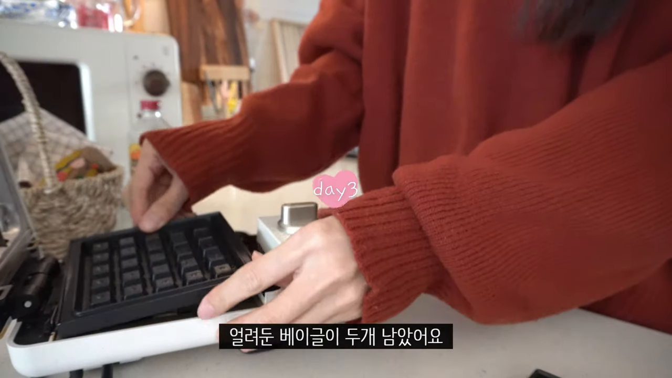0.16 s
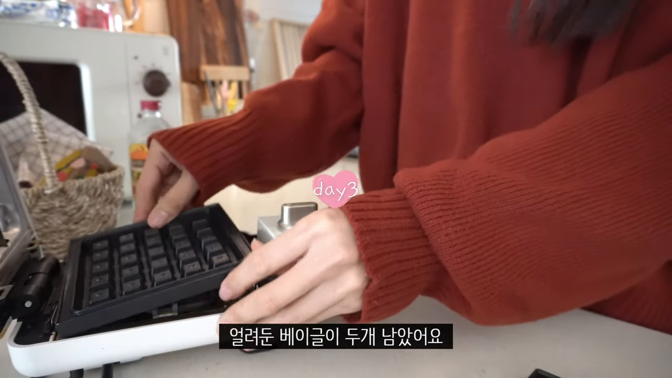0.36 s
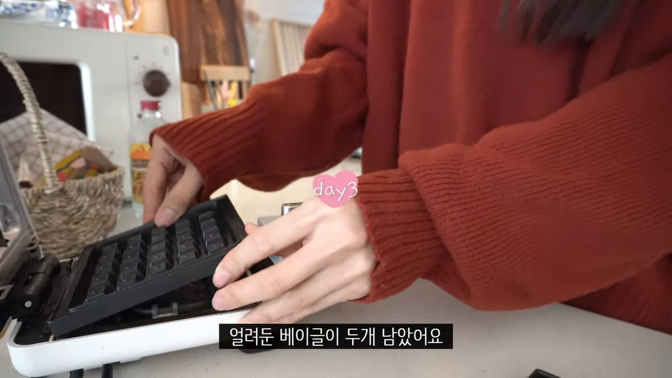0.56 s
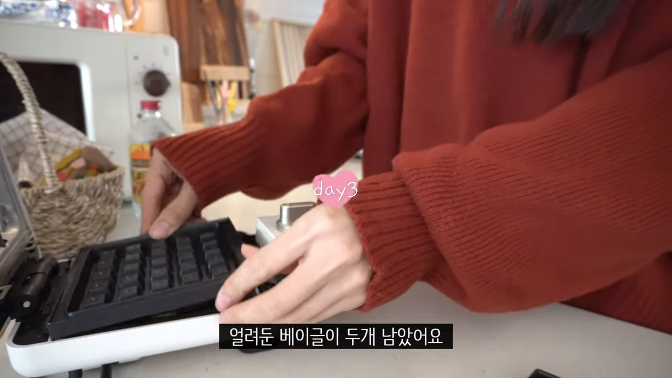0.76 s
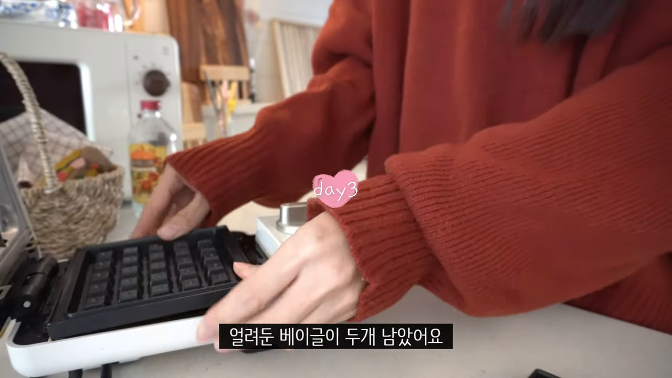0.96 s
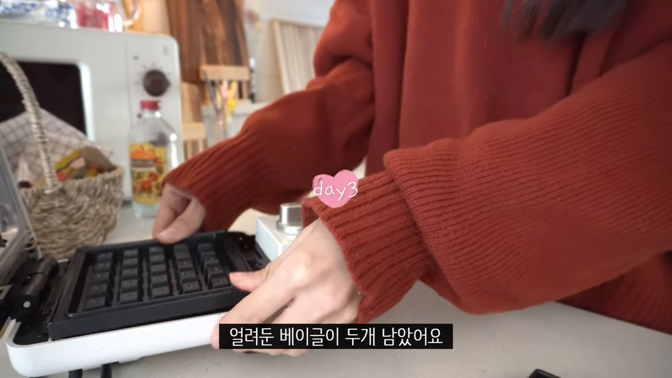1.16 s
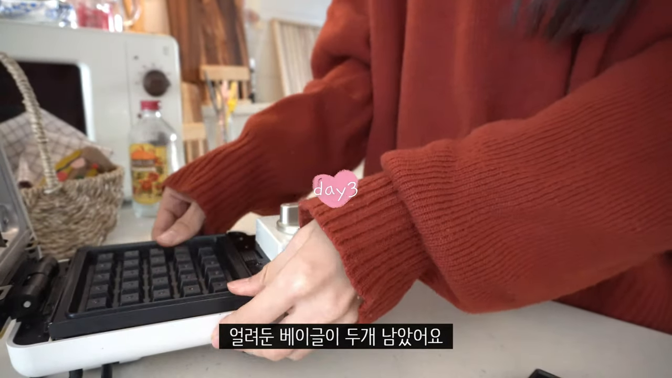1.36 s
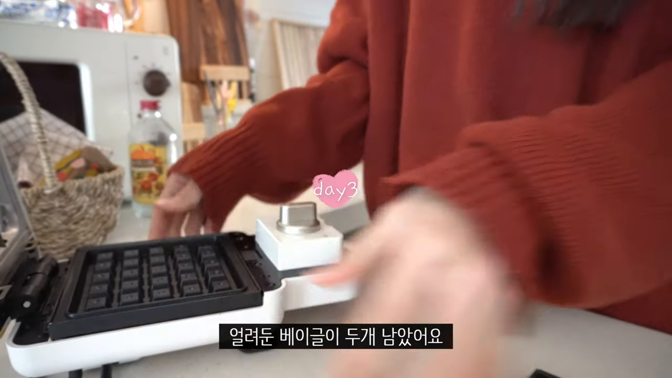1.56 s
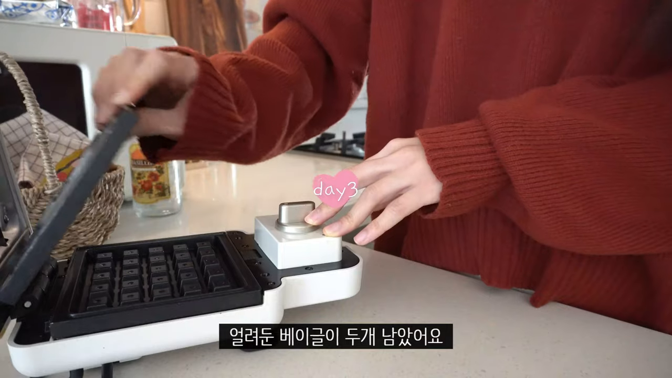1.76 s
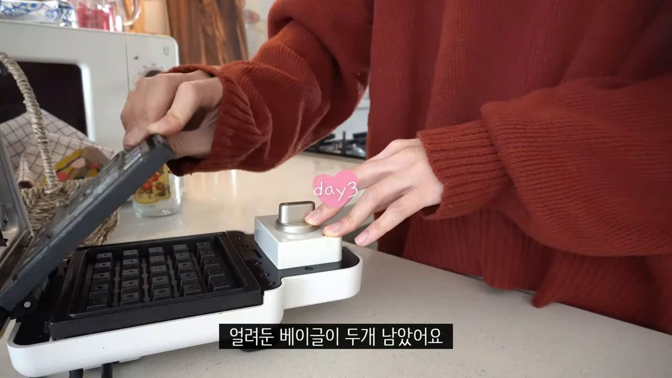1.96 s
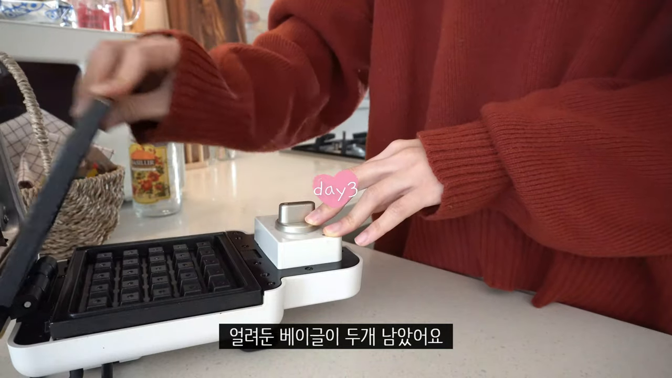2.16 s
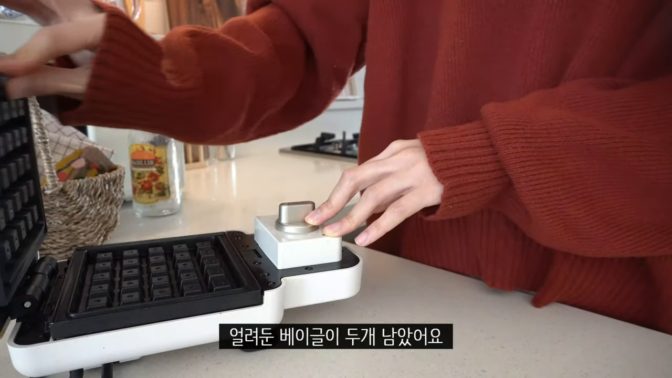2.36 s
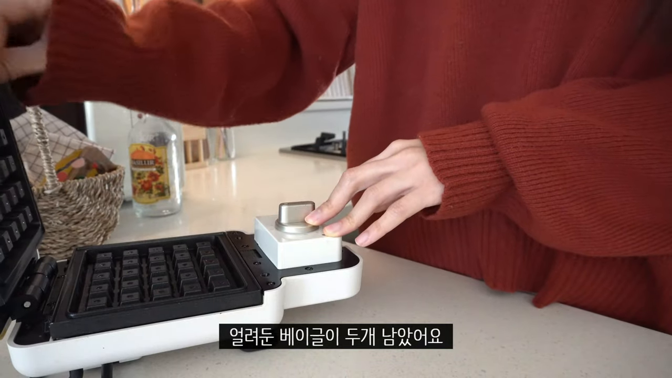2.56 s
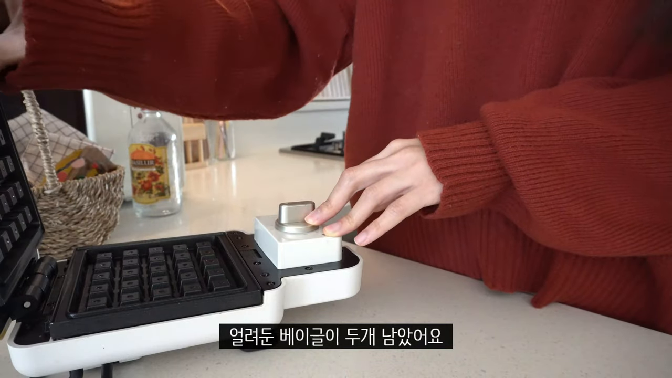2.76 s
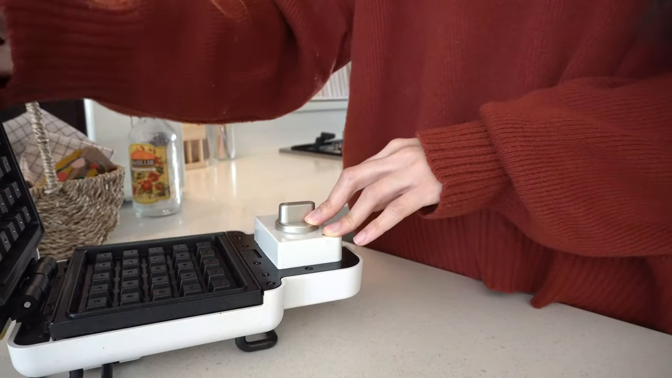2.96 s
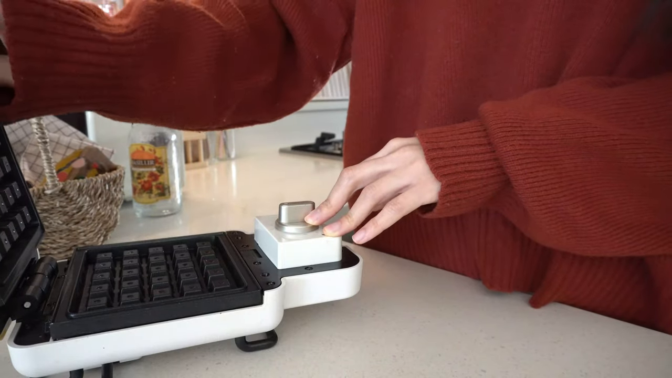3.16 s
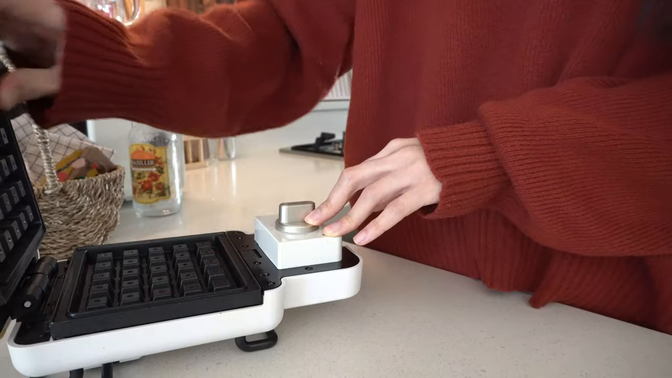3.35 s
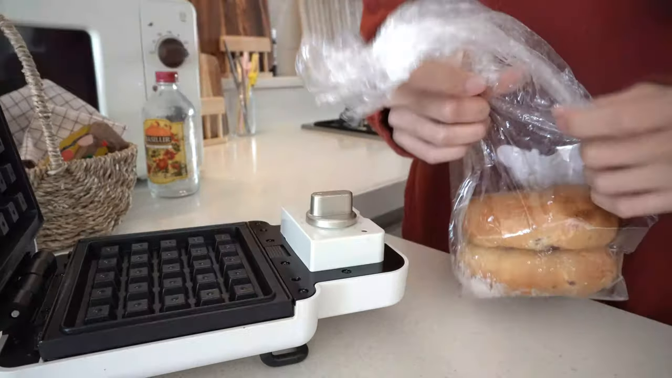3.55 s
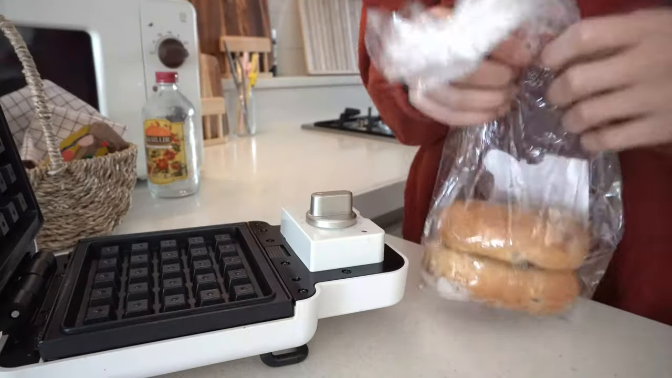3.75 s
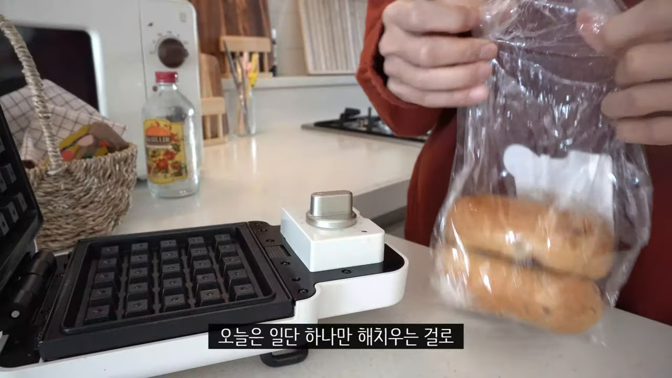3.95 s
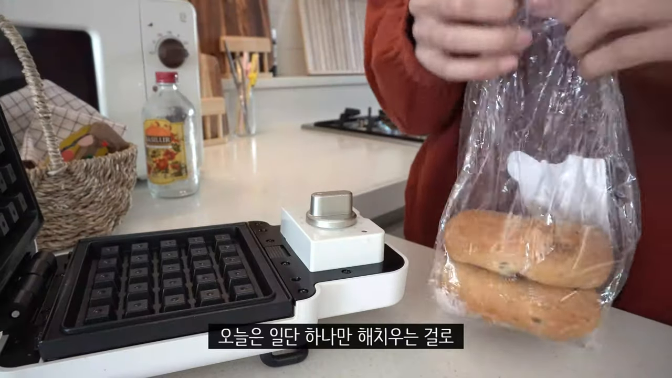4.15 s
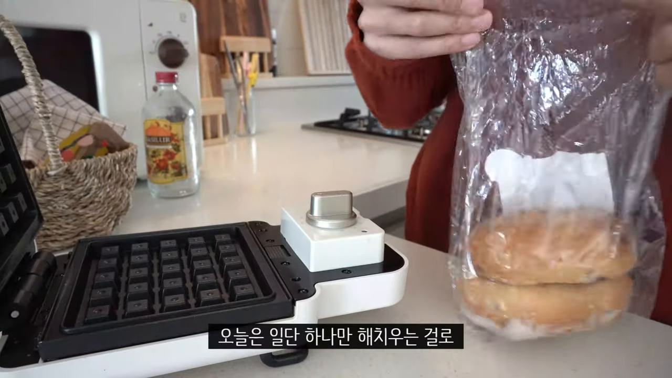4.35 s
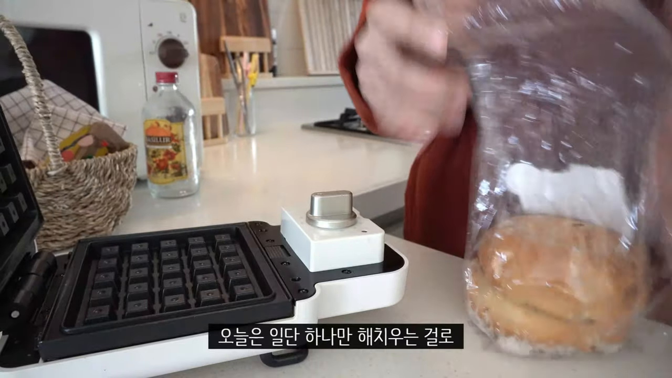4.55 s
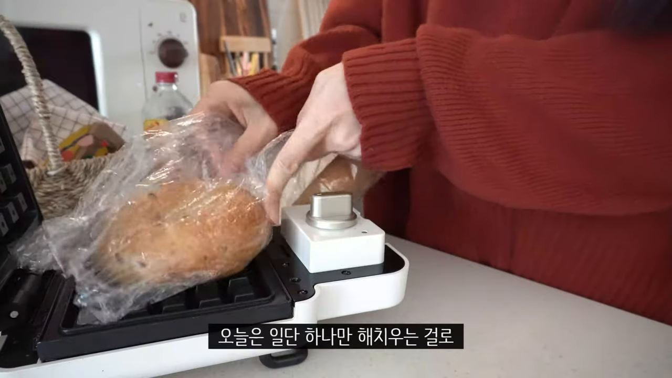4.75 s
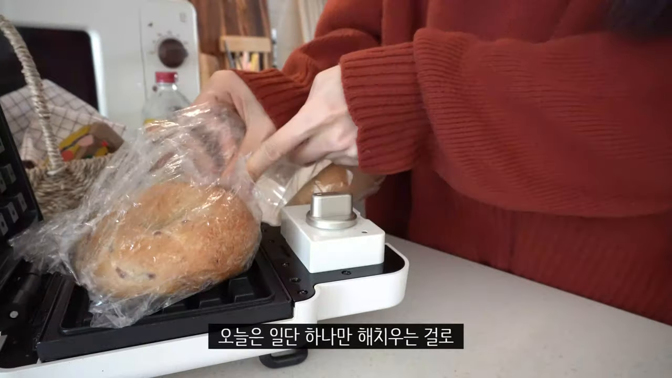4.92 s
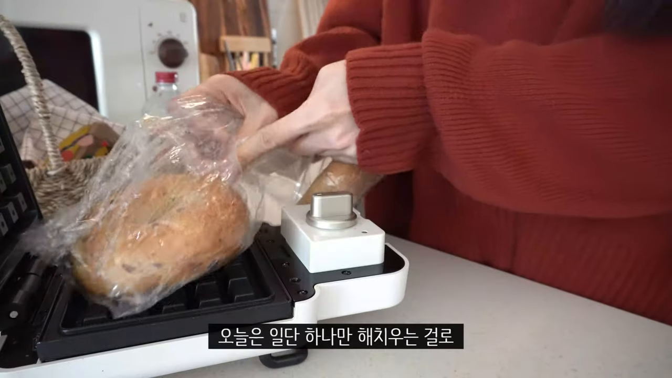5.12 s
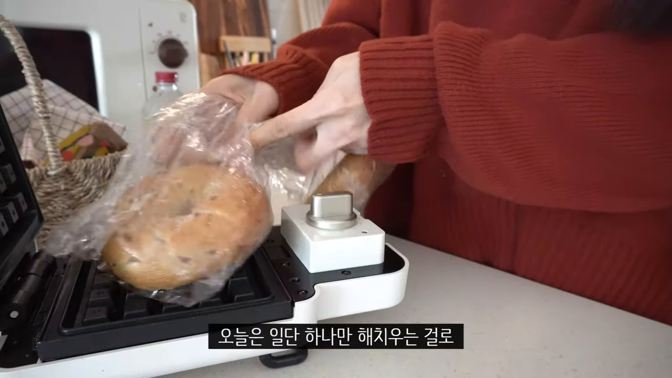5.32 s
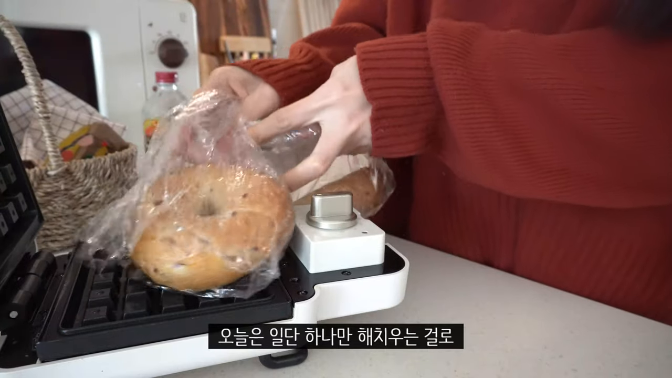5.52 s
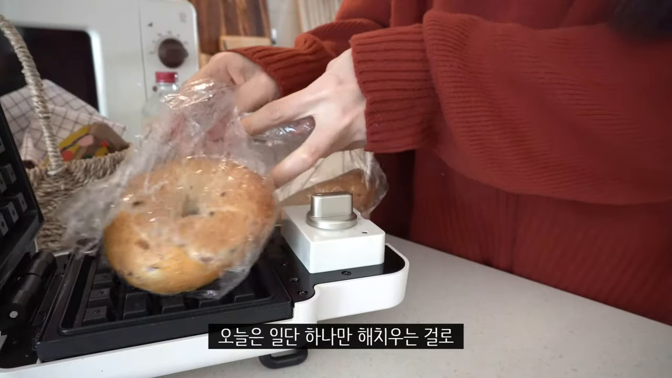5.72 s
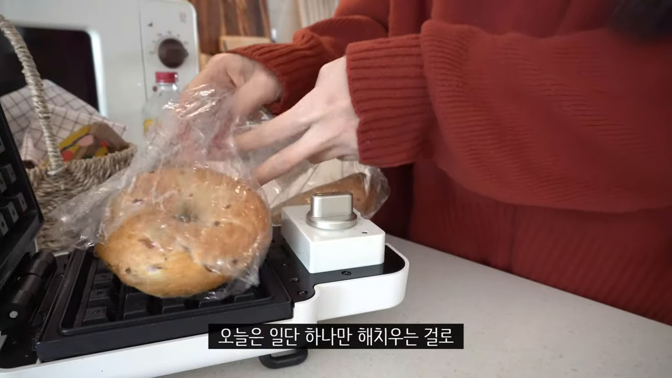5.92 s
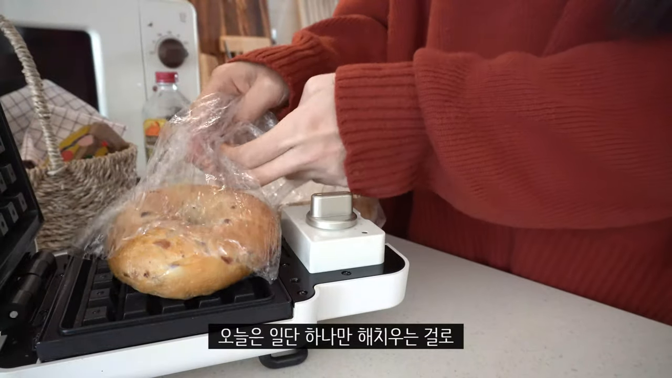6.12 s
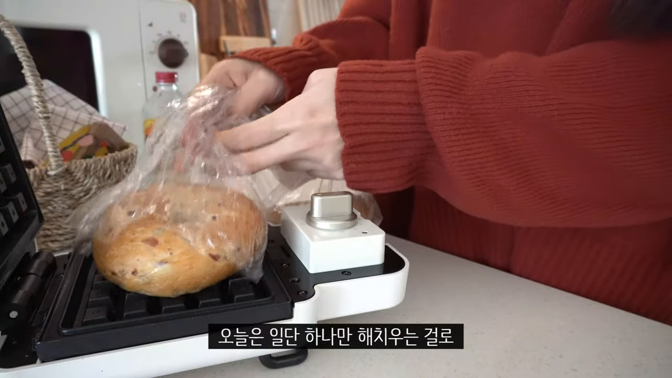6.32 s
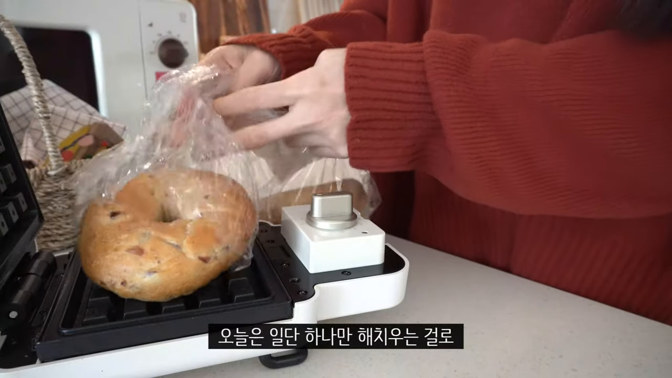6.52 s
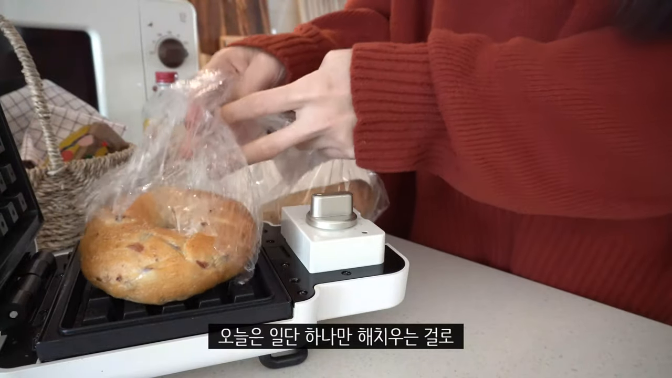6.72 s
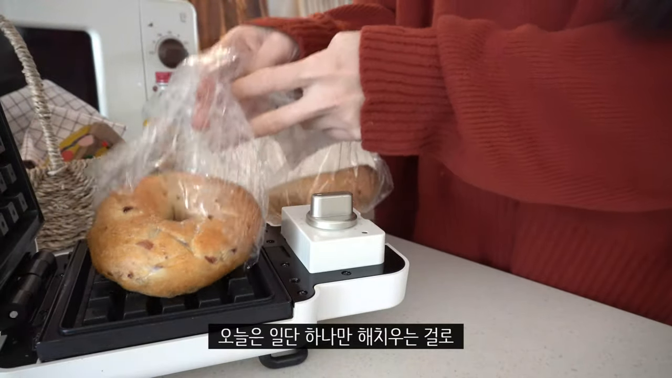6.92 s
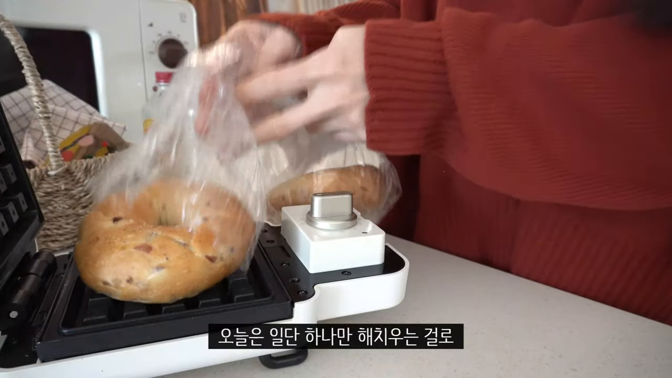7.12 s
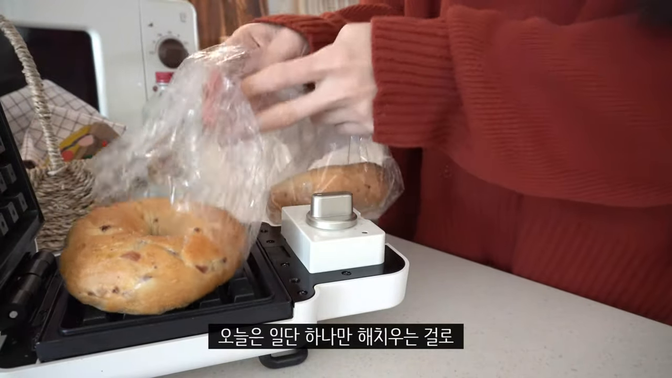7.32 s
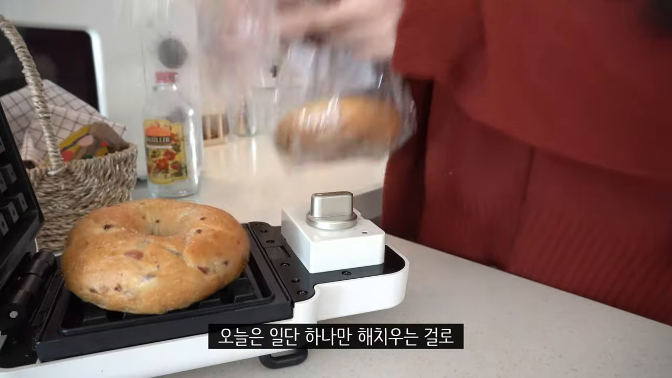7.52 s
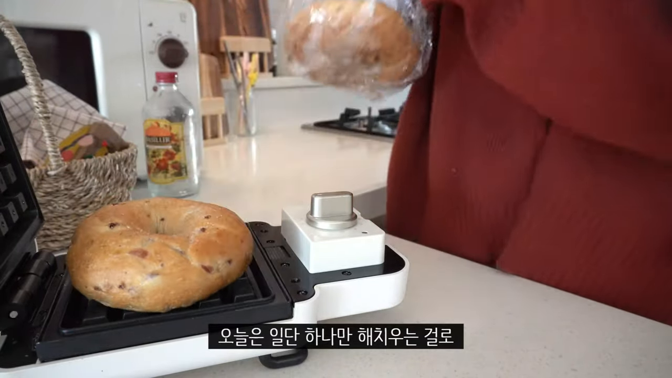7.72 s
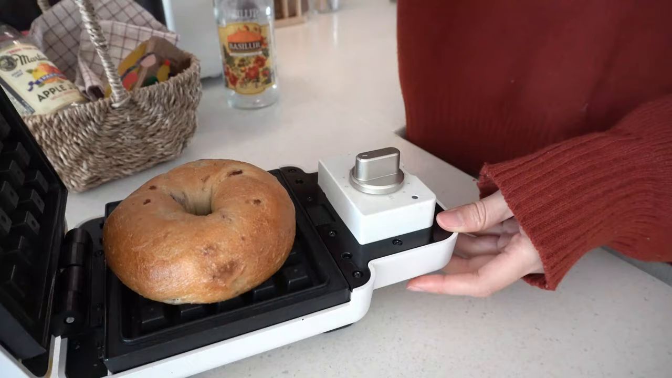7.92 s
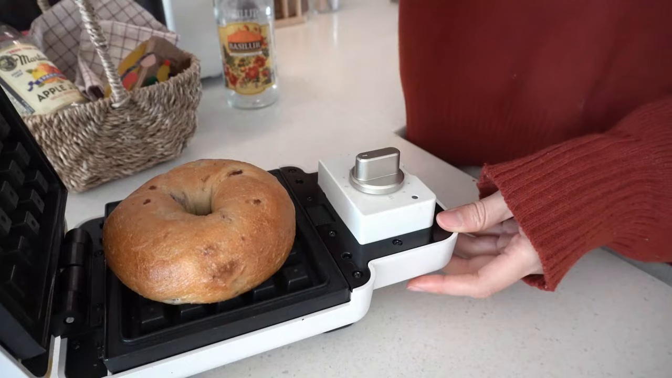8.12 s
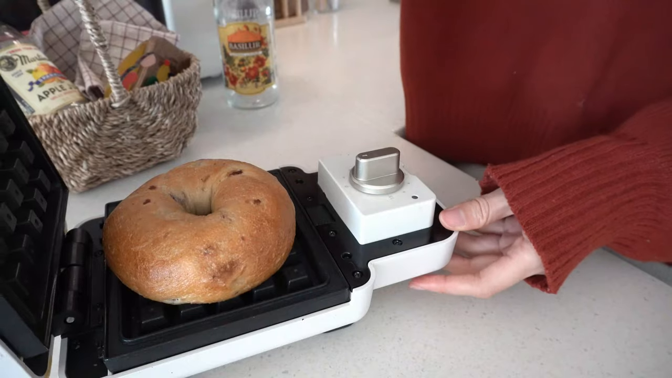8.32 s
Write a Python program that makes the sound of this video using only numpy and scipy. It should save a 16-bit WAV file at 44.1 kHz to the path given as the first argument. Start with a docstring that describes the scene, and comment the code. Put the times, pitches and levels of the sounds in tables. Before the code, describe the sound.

Close up in a small, lightly reverberant kitchen with a faint steady noise bed. From 0 to 1.5 seconds a metal plate is worked into a waffle maker: irregular clanks and rattles, brief gritty scrapes with thin squeaks, and low booms in the counter. Firm knocks fall around 0.2, 0.65 and 0.9, and the hardest, brightest clack at 1.25. Another sharp clack at 1.8 is followed by hollow, ringing knocks as the lid opens, until about 3.35. From 3.5 a thin plastic bag crackles, with the loudest sharp snaps and shakes between 3.7 and 4.6. Softer, patchy rustling continues from 4.7 to 7.9 with small bursts and low bumps. Hollow metallic knocks sound at 7.2, 7.4 and, harder, 7.6. The rustle stops abruptly near 7.96; faint low taps follow to 8.3.

```python
"""In a small kitchen, close to the microphone, a metal baking plate is pressed into a waffle maker: blows ring
its casing and plate modes, filtered noise scrapes as the plate slides, and low sines boom in the counter. The
lid swings open and its own modes ring. Then a thin plastic bag is shaken open and a bagel worked out of it:
creases flip in avalanches. Near the end the bag knocks the appliance as it is lifted; at 7.96 s the rustle and
its reverberation stop dead at once. A quiet noise bed and room reverberation lie around it all; a fast limiter
ducks the loud peaks."""
import sys
import numpy as np
from scipy import signal
from scipy.fft import rfft, irfft, next_fast_len
from scipy.io import wavfile
from scipy.ndimage import uniform_filter1d

SR = 44100
rng = np.random.default_rng(int(sys.argv[2]) if len(sys.argv) > 2 else 0)


def dump(signal):
    """Clip the signal to [-1, 1] and save it as 16-bit WAV at the path in sys.argv[1]."""
    limited = np.clip(np.atleast_2d(signal).T, -1, 1)
    pcm = np.round(limited * 32767).astype(np.int16)
    wavfile.write(sys.argv[1], SR, pcm)


N = 369558
TIME = np.arange(N) / SR
BLOW = TIME[:SR // 2]  # time axis of one blow, and of the reverberation
LEAD = SR // 50  # samples of scuffing before a strike

# Levels in the tables are relative: each source sets its own trims on top.
# Quiet of the kitchen, spectrum: (frequency [Hz], level [dB])
QUIET_COLOUR = [(71, -9.5), (120, -15.5), (204, -20), (498, -22.5), (598, -26), (733, -23), (1170, -30),
                (4390, -41.5), (5380, -38.5), (15500, -49)]
QUIET_DB = -46
# Kitchen reverberation, decay read between these points: (frequency [Hz], t60 [s])
ROOM_DECAY = [(150, 0.75), (600, 0.44), (2000, 0.2764), (5000, 0.6), (9000, -0.22), (15000, 0.61)]
# Kitchen reverberation, spectrum: (frequency [Hz], level [dB])
ROOM_COLOUR = [(150, 1), (800, -2), (2000, 3.5), (3400, 1.5), (6000, 3), (10000, -2), (15500, 10)]

# Counter rumble, spectrum: (frequency [Hz], level [dB])
RUMBLE_COLOUR = [(20, -15), (38, -50.5), (48, 17), (54, 23), (61, 22.5), (80, 17.5), (100, 16.5), (130, 3),
                 (250, -46)]
# Hands lean on the appliance and the counter rumbles: (start [s], length [s], level [dB])
LEANS = [(0.0, 1.2, -34.5), (0.78, 2.05, -32), (2.798, 0.65, -37), (4.3, 0.23, -38), (4.7, 1.04, -44),
         (6.64, 1.07, -31.5), (8.006, 0.58, -38.5)]
LEAN_RISE_DB_PER_S, LEAN_FALL_DB_PER_S = 252.5, 81
# Soft bumps of hands, bag and bagel that reach the counter: (time [s], level [dB])
BUMPS = [(1.285, -4.5), (2.336, -12.5), (2.637, -11), (2.917, -11.5), (3.696, -12), (3.768, -24),
         (4.047, -10.5), (4.1, -17.5), (4.493, -14.5), (4.565, -19.5), (4.898, -23), (5.303, -26),
         (5.829, -30), (6.052, -13), (7.192, -9.5)]
COUNTER_HZ, COUNTER_T60_S = 84, 0.31  # middle pitch and decay of the counter's boom
SWAY_HZ, SWAY_T60_S = 54.9, 0.73  # its deeper sway

# Plate sliding in its seat: (start [s], length [s], scrape [dB], squeal of its edge [dB])
SLIDES = [(0.0, 0.079, -46, -49), (0.113, 0.032, -42, -52), (.315, 0.056, -40.5, -47),
          (0.78, 0.082, -42, -60), (1.31, 0.13, -41, -70), (1.697, 0.029, -44, -62),
          (1.968, 0.015, -30, -66), (2.31, 0.045, -43.5, -75), (2.533, 0.058, -47, -75)]
SLIDE_RISE_DB_PER_S, SLIDE_FALL_DB_PER_S = 803, 330
# Scrape of the plate, spectrum: (frequency [Hz], level [dB])
SLIDE_COLOUR = [(1000, -2), (2300, -1.5), (3900, -9.5), (4450, 0), (4900, -6), (5450, 6.5), (6200, -8.5),
                (7200, -19), (8250, -3.5), (9100, -24.5), (12000, -17), (15500, -33.5)]

BAG_START_S, BAG_END_S = 3.528, 7.961  # the bag rustles between these times
# Pulls and shakes of the bag: (start [s], length [s], crackle [dB], swell [dB/s],
# flapping of broad folds relative to the crackle [dB])
PULLS = [(3.541, 0.016, -18, 1200, -11.5), (3.636, 0.31, -15.5, 198, -8.5), (4.015, 0.11, -15, 355, -10),
         (4.196, .2, -15.5, 200, -9), (4.399, .21, -18, 300, -10.5), (4.666, 0.29, -28, 300, -10.5),
         (4.901, 0.086, -20.5, 500, -6.5), (5.069, .02, -22, 400, -13), (5.122, 0.167, -25, 300, -10.5),
         (5.335, 0.16, -23.5, 300, -11.5), (5.538, .11, -25.5, 400, -11.5), (5.65, 0.37, -29.5, 300, -15.5),
         (5.87, 0.014, -22, 496, -12), (6.046, 0.069, -21, 114, -10.5), (6.302, 0.41, -29.5, 151, -11),
         (6.67, 0.017, -27.5, 250, -4.5), (6.784, 0.05, -29.5, 300, -10), (6.918, 0.041, -27, 550, -9),
         (7.067, 0.024, -25.5, 259, -8.5), (7.203, 0.036, -24, 150, -6), (7.379, 0.016, -27, 300, -6),
         (7.547, 0.02, -23.5, 207, -7.5), (7.71, 0.42, -38.5, 300, -19), (7.896, .05, -29, 400, -11.5)]
PULL_FALL_DB_PER_S = 308
# Single creases snapping through: (time [s], peak level [dB], pitch [Hz])
SNAPS = [(3.5408, -12, 2700), (3.6267, -27, 3020), (3.7297, 10, 5100), (3.751, -2.5, 2760),
         (3.8345, 6, 2440), (3.9673, 3, 3470), (4.0367, 9.5, 2580), (4.1888, -19.5, 2320),
         (4.2884, 4.5, 2300), (4.3233, 13, 1710), (4.4213, 2, 3440), (4.4717, 1, 5740), (4.6014, 0, 5400),
         (4.7777, -5, 3300), (4.9102, -5.5, 4960), (5.0807, -2.5, 3240), (5.3191, -3.5, 2270),
         (5.4452, -3.5, 1760), (5.5202, -3.5, 1470), (5.635, -9.5, 2440), (5.8178, -12, 3020),
         (6.319, -12, 4670), (6.3584, -10, 5900), (6.4624, -4, 5760)]
# Crackle of the film, spectrum: (frequency [Hz], level [dB])
CRACKLE_COLOUR = [(710, -35.5), (1200, -7.5), (1420, -6), (1550, -2.5), (2120, 0), (2310, 0), (2920, 0.5),
                  (3430, 1), (4110, -5), (5550, 1.5), (6580, -9), (8600, -5.5), (10300, -8), (15500, -20.5)]
# Flapping of the broad folds, spectrum: (frequency [Hz], level [dB])
FLAP_COLOUR = [(70, 4), (140, -2), (300, -1), (500, 5), (900, 2.5), (1400, -10.5), (2200, -18.5),
               (4000, -36)]

# Blows on the appliance: (time [s], casing resonance [Hz], casing [dB], plate or lid [dB], sharp edge [dB],
# chatter time scale [s], free ringing relative to plate or lid [dB], push on the counter [dB])
KNOCKS = [(0.1647, 945, -14.5, -23, -35.5, 0.0048, -7, -19.5),
          (0.3156, 1650, -43, -46.5, -45, 0.13, 0, -51), (0.4116, 980, -41.5, -36.5, -45, 0.025, -13, -35),
          (0.453, 920, -29, -31, -35, 0.049, -12, -41), (0.459, 990, -15.5, -23, -26.5, 0.018, 0, -22),
          (0.5559, 1200, -24.5, -34, -35, 0.046, 2, -25), (0.627, 1000, -38, -41, -43, 0.03, -9, -45),
          (0.6458, 1195, -11.5, -13.5, -20.5, 0.0037, -8, -17),
          (0.6945, 990, -17, -28, -36, 0.014, -8, -21), (0.8338, 1036, -29.5, -47, -42, 0.035, -4, -50),
          (0.87, 900, -24, -35, -36, 0.072, -23, -37), (0.882, 940, -17, -19.5, -18.5, 0.039, -12.5, -11),
          (1.0952, 840, -30, -34, -33.5, 0.017, -1.5, -12), (1.108, 805, -23.5, -29, -36, 0.01, -23, -31),
          (1.1838, 880, -32, -54, -48, 0.071, 5, -45), (1.2394, 760, -14, -39, -30, 0.032, -15, -24),
          (1.25, 1473, -7, -1, -5, 0.015, -34, -4.5), (1.4786, 510, -32.5, -52, -52, 0.025, -18, -45),
          (1.514, 584, -25.5, -43, -41.5, 0.013, -25, -27),
          (1.779, 1470, -14, -15, -22, 0.012, -2.5, -16.5), (1.805, 1130, -23.5, -29, -44, 0.062, -2, -45),
          (1.854, 575, -30, -48, -56, 0.061, -15, -28), (2, 950, -32, -46, -47, 0.035, -5, -31),
          (2.156, 820, -32, -51, -51, 0.029, 5, -40), (2.165, 605, -23.5, -46.5, -52, 0.043, 4, -39),
          (2.184, 855, -28.5, -45, -50, 0.015, -12, -17.5),
          (2.2576, 910, -14.5, -29.5, -43, 0.022, -17, -13.5),
          (2.4357, 830, -25.5, -26.5, -40.5, 0.02, -23, -21), (2.5455, 705, -36, -47, -55, 0.046, -11, -35),
          (2.596, 834, -24, -25.5, -49, 0.01, 1.5, -21.5),
          (2.6015, 870, -15.5, -24.5, -23, 0.034, -11, -42),
          (2.7439, 740, -23.5, -35.5, -43, 0.011, -28, -40.5),
          (2.9378, 716, -14, -22, -24, 0.029, -16, -20), (3.3223, 710, -24.5, -42, -45, 0.039, -8, -29),
          (3.348, 746, -54, -58, -57, 0.026, -12, -39.5), (7.2217, 600, -14, -20, -23.5, 0.03, -40, -34),
          (7.231, 910, -23, -22, -40, 0.019, -22, -45), (7.387, 540, -18.5, -27, -30.5, 0.014, -18, -23.5),
          (7.6075, 1150, -11, -19.5, -30.5, 0.024, -7, -13.5), (7.629, 433, -21, -37, -36, 0.03, -15, -45),
          (8.044, 924, -32.5, -35, -40.5, 0.0087, -6.5, -48), (8.144, 840, -39, -63, -59, 0.029, -17, -47),
          (8.245, 860, -39.5, -43.5, -52, 0.052, -16, -55), (8.302, 824, -32.5, -62, -65, 0.014, -18, -19),
          (8.323, 850, -29.5, -39, -57, 0.0094, -19, -45)]
# Modes of the baking plate, before the hand damps them: (frequency [Hz], level [dB], t60 [s])
PLATE_MODES = [(834, -9, 0.3), (1010, -2, 0.23), (1134, -4.5, 0.31), (1296, -4, 0.19), (1632, 10.5, 0.036),
               (2160, -12, 0.095), (2273, 11.5, 0.074), (2260, -11, 0.19), (3070, -10, 0.2),
               (3350, -4, 0.14), (3480, -13, 0.18), (3740, -6.5, 0.24), (4590, 0.5, 0.045),
               (4970, -12, 0.1), (5400, -28, 0.31), (5670, -43, 0.2), (7500, -22, 0.13), (8160, -22, 0.19)]
# Modes of the open lid and its hinge, before the hand damps them: (frequency [Hz], level [dB], t60 [s])
LID_MODES = [(688, -4, 0.33), (844, 8, 0.14), (1193, -1.5, .19), (1604, 6.5, 0.074), (2340, -13, 0.23),
             (3000, -10, 0.26), (3470, 2, 0.14), (3670, -9, 0.13), (4450, -4, 0.11), (4900, -30, .13),
             (5430, 4, 0.12), (5800, -18, 0.1), (5960, -28, 0.12), (7400, -28, .17)]
LID_OPEN_S = 2.2  # from here on the blows ring the lid
# Hollow of the casing, which cannot radiate the treble: (frequency [Hz], level [dB])
HOLLOW_COLOUR = [(1500, 7), (3000, -11.5), (10000, -18)]
# Casing part of a blow, spectrum: (frequency [Hz], level [dB])
CASING_COLOUR = [(100, -13), (200, -8.5), (340, -20), (560, -6), (800, -6.5), (1250, -5.5), (1700, -14.5),
                 (3000, -24), (8000, -70)]
# Dense, short-lived plate or lid modes of a blow, spectrum: (frequency [Hz], level [dB])
CLACK_COLOUR = [(800, -27), (1350, -23), (1700, 5), (2300, 1.5), (2700, -1.5), (3400, 5), (4100, -15.5),
                (6000, -37), (12000, -96)]
# Sharp edge of a blow, spectrum: (frequency [Hz], level [dB])
EDGE_COLOUR = [(2500, -43), (4000, -5), (4500, 0.5), (5000, -4), (5500, 5), (6600, -10.5), (8000, -8.5),
               (11000, -17), (15500, -34)]

TOP_HZ = 15750  # top of the microphone chain


def undb(db):
    """Decibels to gain."""
    return 10 ** (np.asarray(db) / 20)


def unit(x):
    """Scale to rms 1."""
    return x / np.sqrt(np.mean(x ** 2))


def burst(x):
    """Scale so that the 20 ms after the strike have rms 1."""
    return x / np.sqrt(np.mean(x[LEAD:2 * LEAD] ** 2))


def on_log(hz, points):
    """Read (Hz, value) points on a log-frequency axis."""
    f, value = np.transpose(points)
    return np.interp(np.log(hz + 1), np.log(f), value)


def colour(x, points):
    """Causal minimum-phase filter with the given (Hz, dB) shape."""
    n = 2 * next_fast_len(len(x) // 2 + SR // 10)
    hz = np.arange(n // 2 + 1) * SR / n
    cepstrum = irfft(np.log(undb(on_log(hz, points))))
    # folding the cepstrum forward makes the filter causal
    cepstrum[1:n // 2] *= 2
    cepstrum[n // 2 + 1:] = 0
    response = np.exp(rfft(cepstrum))
    return irfft(rfft(x, n) * response)[:len(x)]


def band(x, lo, hi, order=2):
    """Band-pass from lo to hi in Hz."""
    sos = signal.butter(order, [lo, min(hi, SR / 2 - 100)], "band", fs=SR, output="sos")
    return signal.sosfilt(sos, x + 1e-18)


def fade(t, t60):
    """Exponential decay by 60 dB in t60 seconds."""
    return np.exp(-np.log(1000) * t / max(t60, 1e-4))


def add(out, s, x):
    """Mix x in at time s."""
    i = max(int(s * SR), 0)
    out[i:i + len(x)] += x[:len(out) - i]


def stroke(s, length, db, rise, fall):
    """Level in dB of one movement: it swells, holds and dies away at so many dB a second."""
    before, after = np.maximum(s - TIME, 0), np.maximum(TIME - s - length, 0)
    return np.maximum(db - rise * before - fall * after, -120)


def clumps(rate_hz):
    """Random curve, straight between normal values drawn about rate_hz times a second."""
    knots = np.cumsum(rng.exponential(1 / rate_hz, size=4000))
    return np.interp(TIME, knots, rng.standard_normal(len(knots)))


def steady(x, span_s=0.087):
    """Hold the slow level at rms 1 and leave the single crackles standing."""
    n = int(span_s * SR)
    power = uniform_filter1d(uniform_filter1d(x ** 2, n), n // 2)
    return x / np.sqrt(power + 1e-12)


def quiet():
    """The quiet of the kitchen: steady coloured noise."""
    return unit(colour(rng.standard_normal(N), QUIET_COLOUR)) * undb(QUIET_DB)


def kitchen(x, build_s=0.00057):
    """Reverberation of x from one spot: dense reflections, each band with its own decay, the bass longest."""
    noise = rfft(rng.standard_normal(len(BLOW)))
    hz = np.arange(len(noise)) * SR / len(BLOW)
    noise = noise * undb(on_log(hz, ROOM_COLOUR))
    edges = np.geomspace(110, 18000, 8)
    tail = 0
    for lo, hi in zip(edges, edges[1:]):
        reflections = irfft(noise * (hz >= lo) * (hz < hi), len(BLOW))
        tail = tail + reflections * fade(BLOW, on_log(np.sqrt(lo * hi), ROOM_DECAY))
    tail = tail * (1 - np.exp(-BLOW / build_s))
    return signal.fftconvolve(x, tail / np.sqrt(np.sum(tail ** 2)))[:len(x)]


def moving(x):
    """Reverberation of the moving bag: every tenth of a second it sounds from another spot."""
    out, step = np.zeros(N), SR // 10
    for i in range(int(BAG_START_S * SR), int(BAG_END_S * SR), step):
        add(out, i / SR, kitchen(np.pad(x[i:i + step], (0, len(BLOW)))))
    return out


def counter(rise_s=0.0068, sway_db=-11, thump_db=5, bump_db=0, rumble_db=-1, detune=0.11,
            thud_db=-19, thud_t60=0.17, thud_lo_hz=135, thud_hi_hz=420):
    """The counter thuds and booms after each blow or bump, over a deeper sway, and rumbles under leaning hands."""
    lean = np.max([stroke(*row, LEAN_RISE_DB_PER_S, LEAN_FALL_DB_PER_S) for row in LEANS], axis=0)
    out = unit(colour(rng.standard_normal(N), RUMBLE_COLOUR)) * undb(lean + rumble_db)
    sway = undb(sway_db) * np.sin(2 * np.pi * SWAY_HZ * BLOW) * fade(BLOW, SWAY_T60_S)
    pushes = [(row[0], row[-1] + thump_db) for row in KNOCKS]
    pushes += [(s, db + bump_db) for s, db in BUMPS]
    for s, db in pushes:
        hz = COUNTER_HZ * (1 + detune * rng.standard_normal())
        boom = np.sin(2 * np.pi * hz * BLOW) * fade(BLOW, COUNTER_T60_S) + sway
        thud = unit(band(rng.standard_normal(len(BLOW)), thud_lo_hz, thud_hi_hz))
        thud = undb(thud_db) * thud * fade(BLOW, thud_t60)
        add(out, s, undb(db) * (boom + thud) * (1 - np.exp(-BLOW / rise_s)))
    return out


def sliding(scrape_db=-2, squeal_db=-1, grip_db=3, grip_hz=143.0):
    """The plate catches and slips in its seat: a metallic scrape, and a thin squeal from its edge."""
    rub = rng.standard_normal(N) * undb(grip_db * clumps(grip_hz))
    scrape = squeal = 0
    for s, length, scrapes, squeals in SLIDES:
        move = stroke(s, length, 0, SLIDE_RISE_DB_PER_S, SLIDE_FALL_DB_PER_S)
        scrape = scrape + undb(move + scrapes + scrape_db)
        squeal = squeal + undb(move + squeals + squeal_db)
    edge = unit(band(rub, 8000, 8300, order=1))
    return unit(colour(rub, SLIDE_COLOUR)) * scrape + edge * squeal


def buckles(rate, spread_db=4.0, patchy_db=7.0, clump_db=3.5, clump_hz=170.0,
            flutter_db=-9, flutter_t60=0.0033):
    """Creases flip in little avalanches, each with its own size and colour; the film flutters briefly after."""
    chance = rng.random(N)
    size = undb(spread_db * np.minimum(rng.standard_normal(N), 2))
    avalanche = undb(clump_db * clumps(clump_hz))
    flips = (chance < rate * avalanche / SR) * size * np.sqrt(avalanche)
    # the power of each flip leaks away: the envelope of the flutter
    power = signal.lfilter([1], [1, -fade(2 / SR, flutter_t60)], flips ** 2 + 1e-18)
    flutter = np.sqrt(power / (flutter_t60 * SR / np.log(1e6)))
    out = undb(flutter_db) * flutter * rng.standard_normal(N)
    edges = np.geomspace(100, 18000, 15)
    at = np.flatnonzero(flips)
    # each flip gets its own sign and strength in every band
    for lo, hi in zip(edges, edges[1:]):
        share, push = rng.standard_normal((2, N))[:, at], np.zeros(N)
        strength = undb(patchy_db * (np.minimum(share[1], 1.5) - 1.5))
        push[at] = flips[at] * np.sign(share[0]) * strength
        out = out + band(push, lo, hi)
    return out


def snaps(snap_db=-1, snap_t60=0.0095, tone_db=0):
    """Single creases snap through: a short coloured crack with a pitched ring, set by its peak."""
    out, t = np.zeros(N), TIME[:SR // 50]
    for s, db, hz in SNAPS:
        crack = colour(rng.standard_normal(len(t)) * fade(t, snap_t60), CRACKLE_COLOUR)
        tone = np.sin(2 * np.pi * hz * t) * fade(t, snap_t60)
        snap = unit(crack) + undb(tone_db) * unit(tone)
        add(out, s, undb(db + snap_db) * snap / np.abs(snap).max())
    return out


def bag(rate=1150., easy_db=-28, rest_db=-46, dull_db=-41, crowding=0.37, brighten=0.031,
        crackle_db=.5, flap_db=0):
    """The harder the bag is pulled, the more creases flip and the brighter they are; broad folds flap lower."""
    pulls = np.array([stroke(s, length, db, swell, PULL_FALL_DB_PER_S) for s, length, db, swell, _ in PULLS])
    effort = np.maximum(pulls.max(axis=0), rest_db)
    flap = (pulls + np.array(PULLS)[:, -1:]).max(axis=0)
    # rate is the base of flips a second at easy_db
    flips = buckles(rate * undb(crowding * (effort - easy_db)))
    crackle = steady(colour(flips, CRACKLE_COLOUR))
    top = signal.sosfiltfilt(signal.butter(2, 8500, "high", fs=SR, output="sos"), crackle)
    crackle = crackle + top * (undb(brighten * (effort - dull_db)) - 1)
    folds = steady(colour(flips, FLAP_COLOUR)) * undb(flap + flap_db)
    return (crackle * undb(effort + crackle_db) + folds + snaps()) * (TIME > BAG_START_S)


def contact(chatter, strike_t60=0.016, chatter_db=-10, rattle_db=5, scuff_db=-14, scuff_share=1.33):
    """Force of a blow: a scuff as the parts meet, a hard strike with an even spectrum, then uneven rattling."""
    strike = rng.standard_normal(len(BLOW)) * fade(BLOW, strike_t60)
    # keep only the phases, so the spectrum is even, then fade again
    strike = irfft(np.exp(1j * np.angle(rfft(strike))), len(BLOW)) * fade(BLOW, 4 * strike_t60)
    # the rattle takes a new level every 100 samples
    levels = rattle_db * np.minimum(rng.standard_normal(len(BLOW) // 100 + 1), 1.5)
    bounces = np.repeat(undb(levels), 100)[:len(BLOW)]
    buzz = unit(rng.standard_normal(len(BLOW)) * bounces) * fade(BLOW, 3 * chatter)
    swell = fade(BLOW[:LEAD], scuff_share * chatter)[::-1]
    scuff = undb(scuff_db) * rng.standard_normal(LEAD) * swell
    force = strike / np.sqrt(np.mean(strike[:SR // 1000] ** 2)) + undb(chatter_db) * buzz
    return np.concatenate([scuff, force[:-LEAD]])


def ringing(modes, scatter_db=4, hand_t60=0.31):
    """Lasting modes: every point of contact favours other ones, and the hand damps them a little."""
    chance = rng.standard_normal((len(modes), 2))
    ring = 0
    for (f, db, t60), (a, b) in zip(modes, chance):
        gain = np.sign(b) * undb(db + scatter_db * a)
        ring = ring + gain * np.sin(2 * np.pi * f * BLOW) * fade(BLOW, t60)
    # the ring begins at the strike, after the scuff
    return burst(np.pad(ring[:-LEAD], (LEAD, 0)) * fade(BLOW, hand_t60))


def knocks(ring_db=8.5, width_hz=86.0, hollow_db=-2, casing_db=-3, clack_db=-1, edge_db=0, room_db=-5):
    """Each blow sounds the hollow casing, the dense and the lasting modes of plate or lid, and a sharp edge."""
    out = np.zeros(N)
    for s, hz, body, metal, edge, chatter, free, _ in KNOCKS:
        hollow = colour(contact(chatter), HOLLOW_COLOUR)
        hollow = band(hollow, hz - width_hz / 2, hz + width_hz / 2, order=1)
        shell = burst(colour(contact(chatter), CASING_COLOUR))
        casing = undb(hollow_db) * burst(hollow) + undb(casing_db) * shell
        ring = ringing(PLATE_MODES if s < LID_OPEN_S else LID_MODES)
        clack = burst(colour(contact(chatter), CLACK_COLOUR))
        plate = undb(free + ring_db) * ring + undb(clack_db) * clack
        sharp = burst(colour(contact(chatter), EDGE_COLOUR))
        blow = undb(body) * casing + undb(metal) * plate + undb(edge + edge_db) * sharp
        add(out, s - LEAD / SR, blow + undb(room_db) * kitchen(blow))
    return out


def scene(bag_room_db=-7):
    """Appliance and bag in the kitchen; the rustle stops dead."""
    film = bag()
    film = (film + undb(bag_room_db) * moving(film)) * (TIME < BAG_END_S)
    return (quiet() + counter() + sliding() + film + knocks())[None]


def record(dry, ceiling=1.46, hold_s=0.00054, recovery_db_per_s=245.0):
    """Close microphone: a limiter ducks fast and recovers steadily, peaks clip softly, the top is cut off."""
    n = int(hold_s * SR) + 1
    excess = 20 * np.log10(np.maximum(np.abs(dry) / ceiling, 1))
    # after a hard blow the ringing dips, then swells as the gain comes back
    recovery = recovery_db_per_s * TIME
    duck = np.maximum.accumulate(excess + recovery, axis=-1) - recovery
    held = np.clip(dry * uniform_filter1d(undb(-duck), n), -1.5, 1.5)
    rounded = held - 4 / 27 * held ** 3  # reaches full scale at 1.5
    return signal.sosfilt(signal.ellip(12, .1, 70, TOP_HZ, fs=SR, output="sos"), rounded)


dry = scene()
out = record(dry)
dump(out)
```